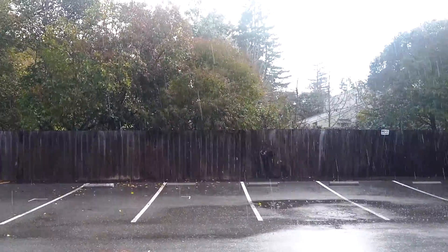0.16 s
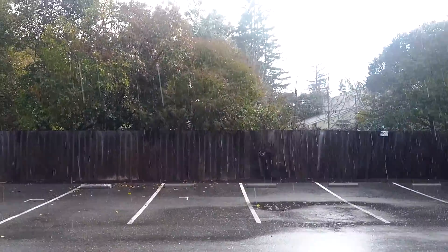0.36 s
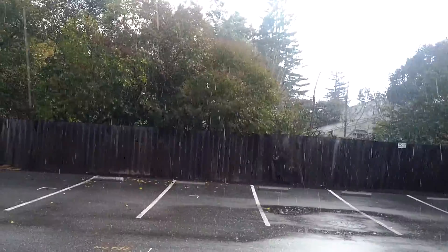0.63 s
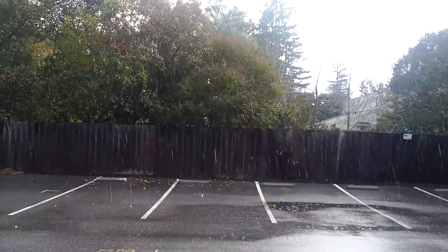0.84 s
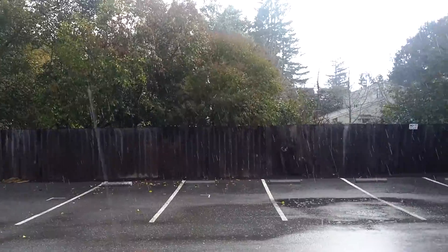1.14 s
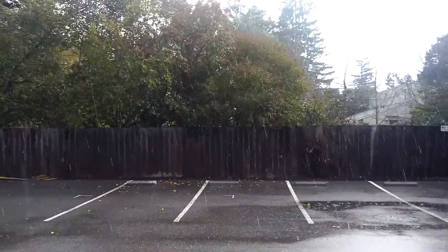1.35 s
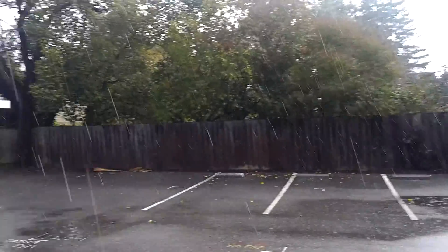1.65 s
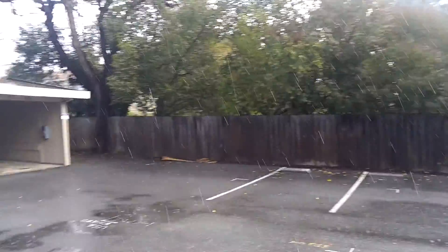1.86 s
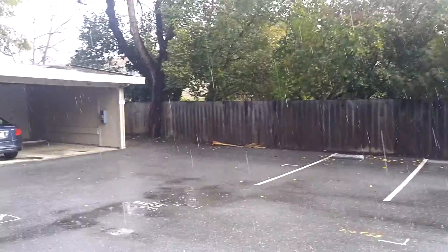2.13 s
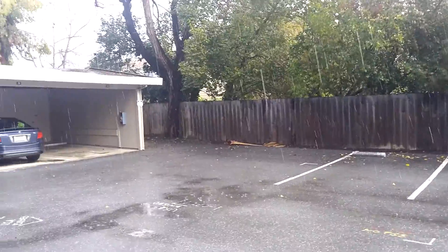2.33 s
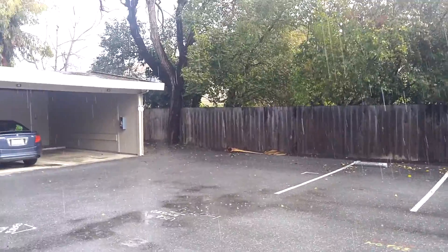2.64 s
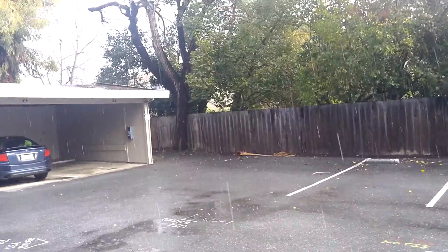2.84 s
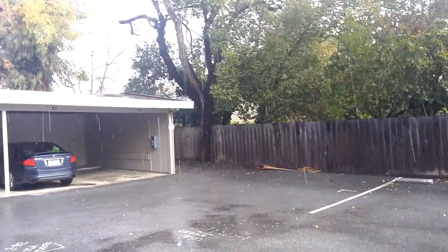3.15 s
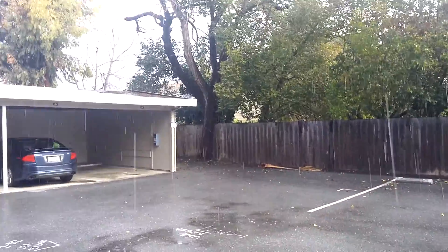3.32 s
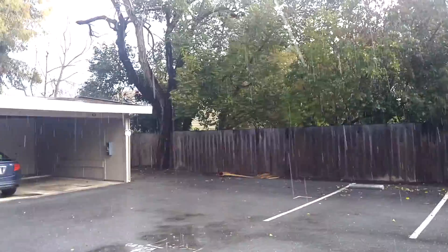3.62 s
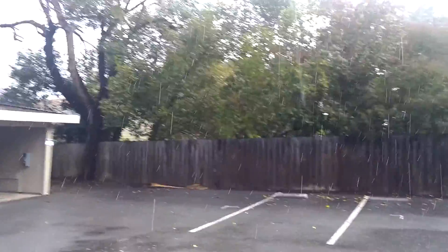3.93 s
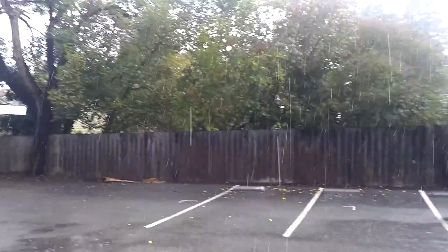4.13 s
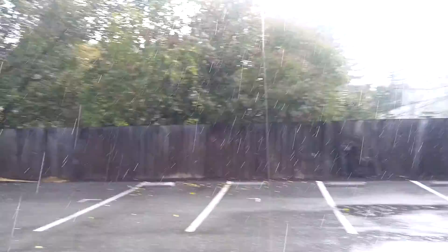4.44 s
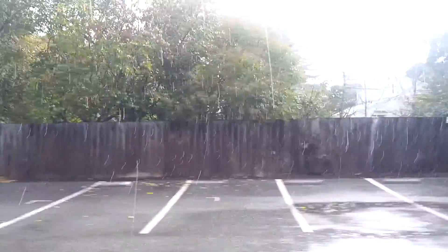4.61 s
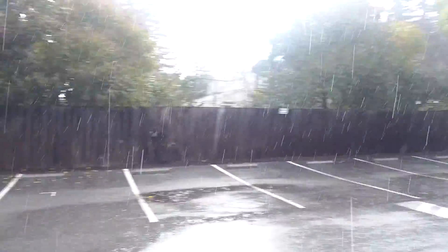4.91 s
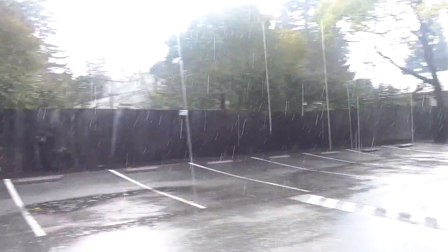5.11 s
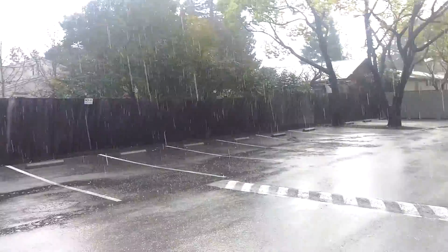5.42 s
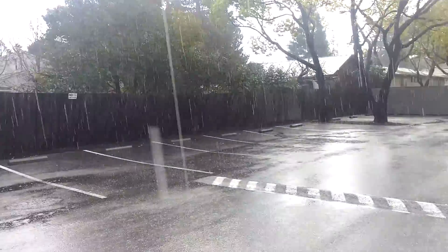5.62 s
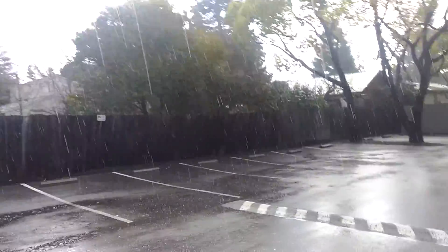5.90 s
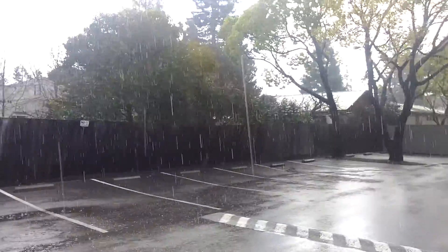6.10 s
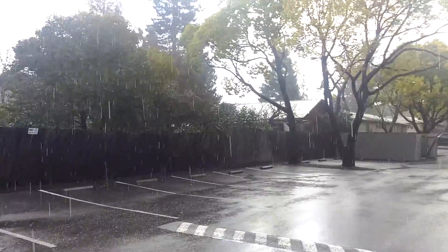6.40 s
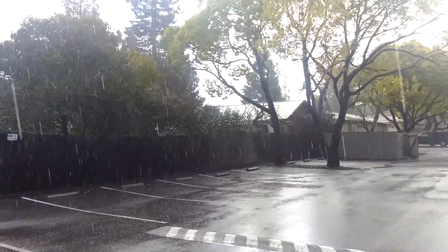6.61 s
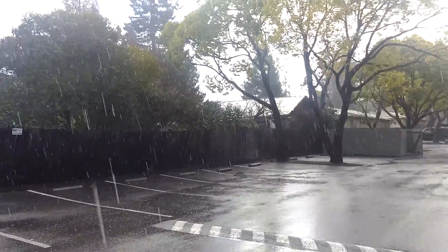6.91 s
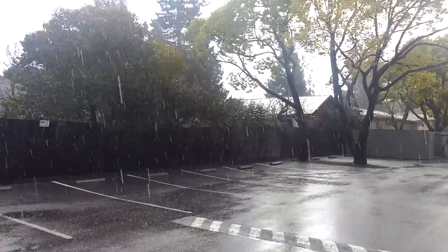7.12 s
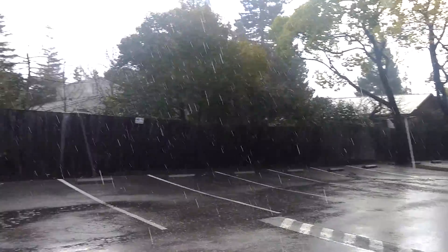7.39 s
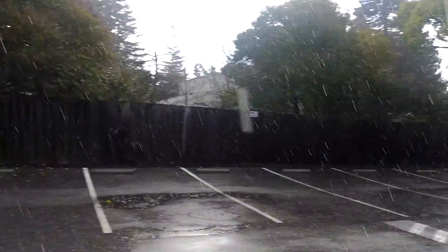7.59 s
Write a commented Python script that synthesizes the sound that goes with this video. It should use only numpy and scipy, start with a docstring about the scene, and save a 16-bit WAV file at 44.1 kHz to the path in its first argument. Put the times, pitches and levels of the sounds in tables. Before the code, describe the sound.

A continuous downpour of hail in an open car park: wide noisy patter, crisp splashes and blurred far roar. Hits ring a roof and gutter on the left, its tone sliding as the camera turns. Dry ticks scatter left and right, one with a faint metallic ping. After a sudden quieter spell the storm returns full, then comes a sharp loud knock and a low double thump near the end.

```python
"""A rush of hail and rain on a wet asphalt car park, heard through a hand-held camera that pans from side to
side. Impacts by the hundred, each a splash of noise, make patter and bright spray over a low roar; to the left
a carport roof and its gutter resonate under the hits. For over a second the downpour sinks in level. Close by,
stones tick as bursts of band noise and one pings on metal; one rings the camera's shell, stones thud softly on
something nearby, and pushes of pressure thump and buffet its microphones."""
import sys
import numpy as np
from scipy import signal
from scipy.fft import rfft, irfft
from scipy.io import wavfile

SR = 44100
rng = np.random.default_rng(int(sys.argv[2]) if len(sys.argv) > 2 else 0)


def bounce(signal):
    """Save signal as a 16-bit WAV file at the path given by the first command-line argument."""
    frames = np.transpose(np.atleast_2d(signal))
    limited = np.clip(frames, -1, 1)
    pcm = np.round(limited * 32767).astype(np.int16)
    wavfile.write(sys.argv[1], SR, pcm)


N = 341775
TIME = np.arange(N) / SR
HZ = np.fft.rfftfreq(N, 1 / SR)

# Slow course of the splashes on the ground close by.
# Each row: time in seconds, level in dB, left over right in dB.
SPRAY_COURSE = [(0, 3.5, -1.5), (2.28, 3.5, -1), (2.56, -5.5, 6), (3.1, -2, 7.5), (3.45, -5.5, 8.5),
                (3.9, -1.3, 3), (4.55, -2, 4), (4.95, 0, 1.5), (5.25, -1.3, 3), (5.43, -7.5, -1.5),
                (6.1, -3.5, -5), (6.7, -5, -5), (7.2, -3.5, -1.5), (7.5, -1.5, -1), (7.75, 2.5, 1)]


def gain_of(db):
    """Decibels to amplitude."""
    return 10 ** (np.asarray(db) / 20)


def evened(x):
    """Scales to rms 1."""
    return x / np.sqrt(np.mean(x ** 2) + 1e-20)


def placed(db, pan_db):
    """Left and right gains for a level and a left-over-right difference, half of it on each side."""
    return gain_of(db + np.array([[.5], [-.5]]) * pan_db)


def sides(left_db, right_db):
    """Left and right gains from a level for each side."""
    return gain_of([[left_db], [right_db]])


def curves(table):
    """The columns of a time table, sample by sample."""
    s, *columns = np.transpose(table)
    return [np.interp(TIME, s, c) for c in columns]


def spectra(table):
    """The columns of a frequency table, bin by bin along a logarithmic axis."""
    hz, *columns = np.transpose(table)
    return np.array([np.interp(np.log(HZ + 1), np.log(hz), c) for c in columns])


def resonances(modes):
    """Gain of a body with broad resonances, from rows of centre in Hz, width in Hz, level in dB."""
    return sum(gain_of(db) / (1 + 2 * ((HZ - hz) / width) ** 2) for hz, width, db in modes)


def ringing(modes, t):
    """Struck modes dying away, from rows of pitch in Hz, level in dB, 60 dB decay in seconds."""
    total = 0
    for k, (hz, db, t60) in enumerate(modes):
        sign = (-1) ** k  # neighbouring modes start in opposite directions
        total = total + sign * gain_of(db - 60 * t / t60) * np.sin(2 * np.pi * hz * t)
    return total


def resonate(x, hz, width):
    """A resonance of rms 1 that follows the curve hz: shift down to zero, smooth twice, shift back."""
    turn = np.exp(2j * np.pi * np.cumsum(hz) / SR)
    r = np.exp(-np.pi * width / SR)
    smooth = signal.lfilter([1], [1, -2 * r, r * r], x / turn)
    return evened((turn * smooth).real)


def hump(s, rise_s, fall_s):
    """Climbs from 0 to 1 at time s and falls back."""
    return np.interp(TIME, [s - rise_s, s, s + fall_s], [0, 1, 0])


def flutter(top_hz):
    """Slow random wander of rms 1, above 1 Hz and rolled off beyond top_hz."""
    s = TIME[::256]
    hz = np.fft.rfftfreq(len(s), s[1])
    band = (hz > 1) / (1 + (hz / top_hz) ** 4)
    slow = irfft(rfft(rng.standard_normal(len(s))) * band, len(s))
    return np.interp(TIME, s, evened(slow))


def add(mix, s, sound):
    """Mixes a stereo sound in at time s."""
    part = mix[:, round(s * SR):][:, :sound.shape[1]]
    part += sound[:, :part.shape[1]]


def impacts(per_s, spread_db, wash_db, scatter_s):
    """Hits of very unequal size, each a short splash of noise, over the blur of countless far ones."""
    chance = rng.random((2, N)) * SR / per_s
    hit = chance < 1
    power = np.zeros((2, N))
    power[hit] = gain_of(spread_db * np.minimum(-np.log(chance[hit]), 4)) ** 2  # the largest are rare
    power = signal.lfilter([1], [1, -np.exp(-1 / (scatter_s * SR))], power)
    envelope = np.sqrt(power / power.mean() + gain_of(wash_db) ** 2)
    return evened(envelope * rng.standard_normal((2, N)))


def heard(drive, gain):
    """Colours two streams of impacts; the microphones share long waves, and hear short ones less alike."""
    # Likeness of the two microphones.
    # Each row: frequency in Hz, likeness from 0 to 1, lag of the left one in seconds.
    likeness = [(50, 0.61, 0), (131, 0.97, 0), (440, 0.92, 0.00047), (680, 0.8, 0.0000065),
                (847, 0.24, 0.000096), (1495, 0.31, 0.00099), (2083, 0.19, 0.00078), (3200, 0.11, 0.0015),
                (5010, 0.019, 0.00021)]
    same, lag_s = spectra(likeness)
    same = np.clip(same, -1, 1)
    a, b = rfft(drive)
    left = a * np.exp(-2j * np.pi * HZ * lag_s)
    right = same * a + np.sqrt(1 - same ** 2) * b
    return irfft(np.array([left, right]) * gain, N)


def roaring(roar_db, side_db):
    """The far downpour: a low roar of blurred impacts that swings with the pan."""
    # Colour of the far downpour. Each row: frequency in Hz, level in dB.
    colour = [(20, -80), (36, -72), (52, -36), (85, -37.5), (130, -34.5), (280, -39), (370, -35),
              (600, -36), (1000, -32), (1600, -36.5), (3000, -58)]
    hits = impacts(per_s=150, spread_db=3.5, wash_db=2, scatter_s=0.0046)
    return heard(hits, gain_of(spectra(colour))) * placed(roar_db + 1.05 * flutter(top_hz=7.4), side_db)


def pattering(flurry):
    """Impacts all over the asphalt, their level fluttering with the flurries."""
    # Colour of the asphalt under the hits. Each row: frequency in Hz, level in dB.
    colour = [(30, -52), (200, -41), (700, -45.5), (1500, -42), (3000, -34), (5000, -36), (8000, -43),
              (16000, -88)]
    hits = impacts(per_s=1050, spread_db=4.5, wash_db=2.5, scatter_s=0.0022)
    return heard(hits, gain_of(spectra(colour))) * gain_of(0.79 * flurry)


def drumming(side_db):
    """Stones ring the roof, each part of it at a slightly different pitch; it lies left and swings with the pan."""
    # Broad body of the roof. Each row: centre in Hz, width in Hz, level in dB.
    body = [(1060, 480, -37)]
    # Course of the drumming. Each row: time in seconds, body level in dB, note level in dB.
    course = [(0, -5, -52), (.6, -2, -51.5), (1.8, 0.5, -49.5), (3.5, -0.5, -52), (4.15, 0, -53.5),
              (4.3, 6, -48), (4.72, -3, -48.5), (4.9, -3, -52.5), (5.5, -1, -51), (5.9, 0, -58),
              (7.2, 1.5, -58), (7.75, -1, -54)]
    note_hz, note_width_hz, wander = 868, 137, 0.021  # wander is a share of the pitch
    hits = impacts(per_s=110, spread_db=4.5, wash_db=0.5, scatter_s=0.0056)
    note = resonate(heard(hits, 1), note_hz * (1 + wander * flutter(top_hz=12.3)), note_width_hz)
    body_db, note_db = curves(course)
    roof = gain_of(body_db) * heard(hits, resonances(body)) + gain_of(note_db) * note
    return roof * placed(0.67 * flutter(top_hz=9.2), 2.5 + 2.1 * side_db)


def rattling(gutter_db, side_db):
    """Stones rattle in the gutter, to the left, and ring its two notes in changing strength."""
    # Broad body of the gutter. Each row: centre in Hz, width in Hz, level in dB.
    body = [(2146, 740, -31)]
    # Its two notes, lower first. Each row: centre in Hz, width in Hz.
    notes = [(2040, 270), (2450, 320)]
    # How strongly the hail rings them. Each row: time in seconds, lower note in dB, upper note in dB.
    note_course = [(0, -52, -47), (.7, -49, -48), (.9, -47.5, -48.5), (1.9, -45.5, -53), (2.4, -46.5, -51),
                   (3.8, -45.5, -49), (4.45, -48, -47.5), (4.95, -45.5, -47), (5.35, -46.5, -48),
                   (5.6, -51, -53), (6.1, -51.5, -46), (6.65, -45, -51), (7.2, -49, -51),
                   (7.75, -47.5, -47)]
    # Clusters of hail swell the rattle. Each row: time in seconds, boost in dB.
    clusters = [(.18, 4.5), (.47, 5), (1.12, 3), (1.62, 0.5), (1.77, 1.5), (1.92, 2.5), (4.4, 3.5),
                (4.7, 2), (4.93, 1.5), (5.06, 1.5), (5.34, 2.5), (6.56, 1.5), (6.7, 1.5)]
    wander = 0.028  # share of the pitch, as the stones land here and there
    out = heard(impacts(per_s=190, spread_db=3.5, wash_db=-2, scatter_s=0.0064), resonances(body))
    for (hz, width), note_db in zip(notes, curves(note_course)):
        hits = heard(impacts(per_s=290, spread_db=3, wash_db=-1, scatter_s=0.004), 1)
        out = out + gain_of(note_db) * resonate(hits, hz * (1 + wander * flutter(top_hz=25)), width)
    for s, boost_db in clusters:
        gutter_db = gutter_db + boost_db * hump(s, rise_s=0.082, fall_s=0.12)
    return out * placed(gutter_db + 0.79 * flutter(top_hz=14), 7 + .45 * side_db)


def spraying(flurry):
    """Bright splashes close by: a slow drift in level and side, with short flurries of one shape on top."""
    # Colour of the splashes. Each row: frequency in Hz, left level in dB, right level in dB.
    colour = [(3520, -87, -93), (5460, -39, -43.5), (6980, -32.5, -37), (9300, -32, -32),
              (11100, -39, -32.0), (12950, -45, -38), (15000.0, -41.5, -40), (16000.0, -41, -41)]
    # Short flurries. Each row: time in seconds, boost in dB, shift of left over right in dB.
    flurries = [(3.28, 1, -2), (4.7, 2.5, -1), (5.52, 3.5, 0), (5.72, 3, 1), (5.9, 4, 0), (6.25, 5, 6),
                (6.49, 3, -2), (6.89, 7, 4), (7.07, 4, 1), (7.33, 5, -.5)]
    spray_db, side_db = curves(SPRAY_COURSE)
    for s, boost_db, shift_db in flurries:
        shape = hump(s, rise_s=0.046, fall_s=0.14)
        spray_db = spray_db + boost_db * shape
        side_db = side_db + shift_db * shape
    hits = impacts(per_s=1070, spread_db=4.0, wash_db=2.5, scatter_s=0.0022)
    return heard(hits, gain_of(spectra(colour))) * placed(spray_db + 0.79 * flurry, side_db)


def downpour():
    """Roar, patter, roof and gutter follow one overall level; the close spray keeps its own course."""
    # What the camera faces as it pans.
    # Each row: time in seconds, roar level in dB, gutter level in dB, left over right in dB.
    facing = [(0, -1.5, -0.5, 0), (.6, -2, -2, 1), (1.1, -3, -1, 0), (1.65, -3.5, -1.5, 0),
              (2.1, -3.5, -3, -2.5), (2.45, -0.5, -4, -0.5), (2.95, 1, 0, 0), (3.4, 0.5, -3.5, -1.5),
              (4.1, 1, -0.5, -2), (5.05, 0.5, -0.5, 0), (5.4, 7, 2, -0.5), (5.9, 4.5, 0.5, 1.3),
              (6.2, 3, .5, 0.5), (6.45, 1.5, .5, 1.5), (6.7, 3.5, -0.5, 4.5), (7.2, 4, 0, 4.5),
              (7.75, 0.3, 1.5, 4.5)]
    # Overall level of roar, patter, roof and gutter, with an abrupt rise near 0.8 s.
    # Each row: time in seconds, level in dB.
    overall = [(0, -4), (.76, -3), (.84, 1), (2.4, -0.16), (3.9, .5), (4.5, 2.5), (5.05, 3.5), (5.4, -0.9),
               (6.45, 2.5), (6.75, 0.5), (7.25, 0.7), (7.75, 3)]
    roar_db, gutter_db, side_db = curves(facing)
    flurry = flutter(top_hz=15.6)  # patter and spray come in the same flurries
    total = roaring(roar_db, side_db) + pattering(flurry)
    total += drumming(side_db) + rattling(gutter_db, side_db)
    return total * gain_of(curves(overall)[0]) + spraying(flurry)


def turning(wander=0.063):
    """A resonant band of coarse patter on the left; its pitch follows the camera's direction and wanders quickly."""
    # Course of the band. Each row: time in seconds, centre in Hz, level in dB.
    course = [(0, 2440, -58), (1.6, 1960, -49), (2.4, 1970, -56), (4.6, 2510, -48), (4.95, 2500, -48),
              (5.08, 2220, -44.5), (5.16, 1820, -50), (5.26, 1620, -47), (5.38, 1460, -43),
              (5.6, 1450, -50.5), (6.7, 1850, -47), (7.75, 2240, -61)]
    hz, db = curves(course)
    patter = heard(impacts(per_s=90, spread_db=3, wash_db=-3, scatter_s=0.0094), 1)
    band = resonate(patter, hz * (1 + wander * flutter(top_hz=35)), width=360)
    return band * placed(db, pan_db=10.5)


def faint_tones(per_s=70, db=-43, spread_db=3.5, low_hz=2600, high_hz=12500, t60=0.014):
    """Faint brief decaying tones at random times, pitches and sides, in level with the spray's slow drift."""
    out, t = np.zeros((2, N)), np.arange(SR // 40) / SR
    spray_db = curves(SPRAY_COURSE)[0]
    for when, pitch, size, side in rng.random((round(per_s * N / SR), 4)):
        level_db = db + spray_db[int(when * N)] + spread_db * min(-np.log(1 - size), 3)
        hz = low_hz * (high_hz / low_hz) ** np.sqrt(pitch)  # more of them high
        add(out, when * N / SR, placed(level_db, 20 * (side - .5)) * ringing([(hz, 0, t60)], t))
    return out


def dip():
    """Gain that drops abruptly, stays low and comes back, with one brief swell on the way."""
    start_s, end_s, ramp_s, depth_db = 2.495, 3.805, 0.051, -9
    low = np.clip(np.minimum(TIME - start_s, end_s - TIME) / ramp_s, 0, 1)
    swell_db = 5 * hump(2.985, rise_s=0.085, fall_s=0.045)
    return gain_of(depth_db * low + swell_db)


def buffets():
    """Each puff of air on the microphones is a short swell of low noise."""
    # Soft puffs.
    # Each row: start in seconds, length in seconds, left level in dB, right level in dB, centre in Hz.
    puffs = [(0.097, 0.18, -57, -53, 65), (.5, 0.38, -60, -55.5, 62), (0.813, 0.15, -58, -47, 52),
             (1.075, 0.21, -58, -51.5, 80), (1.3, 0.17, -62, -55, 70), (1.75, 0.35, -56.5, -52, 130),
             (2.33, 0.18, -56.5, -55, 100)]
    out = np.zeros((2, N))
    for s, length_s, left_db, right_db, hz in puffs:
        size = round(length_s * SR)
        puff = resonate(rng.standard_normal(size), np.full(size, hz), width=67)
        add(out, s, sides(left_db, right_db) * puff * signal.windows.tukey(size, .8))
    return out


def tick(hz, t60, ring_db=-10, snap_s=0.00048):
    """A stone snaps, then its splinters and spray die away: band noise around hz, scaled to peak 1."""
    t = np.arange(SR // 8) / SR
    shape = np.exp(-t / snap_s) + gain_of(ring_db - 60 * t / t60)
    band = signal.butter(2, [hz * 0.89, min(hz * 1.157, SR * .45)], "band", fs=SR)
    snap = signal.lfilter(*band, shape * rng.standard_normal((2, len(t))))
    return snap / abs(snap).max()


def stones():
    """Near stones tick alike, left or right; larger ones on roof and gutter ring lower and longer."""
    # Single stones on the asphalt nearby. Each row: start in seconds, level in dB, left over right in dB.
    ground = [(.389, -24, 7), (.446, -22, -7), (.549, -22, -7), (.665, -23, -8), (.978, -25, -7),
              (1.185, -23, -7), (1.406, -26, -7), (1.643, -20.5, -7), (1.701, -22, -7), (2.082, -23, -9),
              (2.179, -24, -7), (2.261, -25, -8), (2.971, -30, 7), (3.089, -34, 7), (4.181, -28, 6),
              (4.866, -22, -4), (5.19, -26, 6), (5.228, -24, -4), (5.502, -24.5, -8), (5.5602, -30, 5),
              (6.887, -25, -6), (7.068, -26, 7), (7.722, -20, 0)]
    # Larger stones on roof and gutter.
    # Each row: start in seconds, level in dB, left over right in dB, pitch in Hz, 60 dB decay in seconds.
    clatters = [(.178, -31, 8, 2390, 0.11), (.229, -36, 10, 1810, .08), (.452, -31.5, 7, 2410, .1),
                (.495, -37, 7, 855, .1), (1.099, -29, 6.5, 2200, .08), (1.275, -30, 9, 2070, .08),
                (1.566, -30, 6, 1990, .06), (1.614, -27.5, 10, 2160, .16), (1.732, -32, 10, 1980, .1),
                (1.895, -30, 4.5, 2020, .14), (2.251, -28.5, 2, 2050, .05), (2.759, -37, 3.5, 2090, .09),
                (2.985, -40, 4, 2000, .08), (3.08, -39, 5, 2080, .06), (3.841, -31, 5, 1640, .08),
                (3.942, -29.5, 9, 2300, .08), (4.084, -31, 9, 2070, .08), (4.423, -28, -7, 1080, .2),
                (4.536, -30, 7, 1810, .08), (4.673, -29, 6, 2600, .1), (4.698, -26.5, 5.5, 2190, .08),
                (4.928, -32, 8, 1550, .08), (5.116, -24.5, 7, 1880, .11), (5.199, -27, 5, 2070, .07),
                (5.232, -31.5, 9, 1205, .1), (5.349, -31, 8, 1460, .1), (5.388, -27, 6, 2070, .08),
                (5.395, -30, 3, 1400, 0.11), (5.79, -30.5, 10, 1720, .08), (6.735, -30, 8, 1990, .08),
                (6.782, -29, 7, 2050, .1), (6.797, -35, 9, 960, .1), (7.165, -28, 4.5, 1720, .08),
                (7.653, -29, 10, 1980, .08)]
    out = np.zeros((2, N))
    for s, db, pan_db in ground:
        add(out, s, placed(db, pan_db) * tick(hz=9300, t60=0.038))
    for s, db, pan_db, hz, t60 in clatters:
        add(out, s, placed(db, pan_db) * tick(hz, t60, ring_db=-2))
    return out


def ping(rise_s=.004, spray_db=-29, spray_t60=.085):
    """A stone skids on a piece of metal, which rings faintly in its spray of noise."""
    # The one hit: start in seconds, left gain in dB, right gain in dB.
    hit = (2.2535, -9, 0)
    # Modes of the metal. Each row: pitch in Hz, level in dB, 60 dB decay in seconds.
    metal = [(5100, -31, 0.13), (9050, -29, .13), (11400, -31, .12)]
    out, t = np.zeros((2, N)), np.arange(SR // 4) / SR
    s, left_db, right_db = hit
    band = signal.butter(2, [6500, 12500], "band", fs=SR)
    spray = evened(signal.lfilter(*band, rng.standard_normal((2, len(t)))))
    sound = ringing(metal, t) + spray * gain_of(spray_db - 60 * t / spray_t60)
    add(out, s, sides(left_db, right_db) * np.minimum(t / rise_s, 1) * sound)
    return out


def thuds(rise_s=.0018):
    """Stones land on something soft nearby: a few hollow notes swell together and quickly die."""
    # The soft blows. Each row: start in seconds, left gain in dB, right gain in dB.
    blows = [(2.9295, -35, -50), (2.9515, -42, -46), (2.985, -38, -43), (4.764, -33, -36),
             (5.5603, -19.5, -15.5)]
    # Hollow notes that all of them give. Each row: pitch in Hz, level in dB.
    hollow = [(531, -2), (380, -3.5), (180, -12)]
    out, t = np.zeros((2, N)), np.arange(SR // 40) / SR
    swell = (t / rise_s * np.exp(1 - t / rise_s)) ** 2
    swing = swell * sum(gain_of(db) * np.sin(2 * np.pi * hz * t) for hz, db in hollow)
    for s, left_db, right_db in blows:
        add(out, s, sides(left_db, right_db) * swing)
    return out


def thumps(low_cut_hz=82):
    """A drop on a microphone port is one smooth push; the port's leak and the bass cut make it swing back."""
    # Drops on the ports. Each row: start in seconds, left gain in dB, right gain in dB,
    # rise to the peak of the push in seconds, leak of the port in Hz.
    drops = [(6.1945, -43, -26, .0016, 160), (7.3746, -45, 4.5, 0.0016, 158),
             (7.3919, -45, 1.5, 0.0019, 140)]
    out, t = np.zeros((2, N)), np.arange(SR // 20) / SR
    for s, left_db, right_db, rise_s, leak_hz in drops:
        push = (t / rise_s * np.exp(1 - t / rise_s)) ** 6
        leaked = signal.lfilter(*signal.butter(1, leak_hz, "high", fs=SR), push)
        add(out, s, -sides(left_db, right_db) * leaked)
    return signal.lfilter(*signal.butter(2, low_cut_hz, "high", fs=SR), out)


def knock(rise_s=0.00047, scatter_db=-25, scatter_t60=0.48, ceiling=0.93):
    """A stone rings the camera's shell for a few milliseconds and shatters; so small a body gives no bass."""
    # The one hit: start in seconds, left gain in dB, right gain in dB.
    hit = (6.466, -17, -.5)
    # Modes of the shell. Each row: pitch in Hz, level in dB, 60 dB decay in seconds.
    shell = [(1880, 5, .0046), (2900, 1.5, .0052), (3706, 2.5, .0045), (5513, 0, .0032), (7513, -17, .0053),
             (11501, 1.5, .0026), (4068, -18, .033)]
    out, t = np.zeros((2, N)), np.arange(SR // 4) / SR
    s, left_db, right_db = hit
    band = signal.butter(1, [1800, 9000], "band", fs=SR)
    splinters = signal.lfilter(*band, rng.standard_normal((2, len(t))))
    scatter = splinters * gain_of(scatter_db - 60 * t / scatter_t60)
    blow = (1 - np.exp(-t / rise_s)) * (ringing(shell, t) + scatter)
    blow = signal.lfilter(*signal.butter(4, 1220, "high", fs=SR), blow)
    add(out, s, sides(left_db, right_db) * blow)
    return ceiling * np.tanh(out / ceiling)  # the microphone overloads


def scene():
    """The downpour, which dips in level, under the single near hits, which do not."""
    rain = (downpour() + turning() + faint_tones()) * dip()
    return rain + buffets() + stones() + ping() + thuds() + thumps() + knock()


def record(dry, edge_hz=15900):
    """The camera's band limit: a steep low-pass."""
    low_pass = signal.firwin(511, edge_hz, window=("kaiser", 9), fs=SR)
    return signal.oaconvolve(dry, low_pass[None], "same", axes=-1)


dry = scene()
out = record(dry)
bounce(out)
```